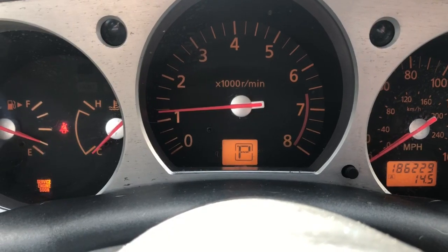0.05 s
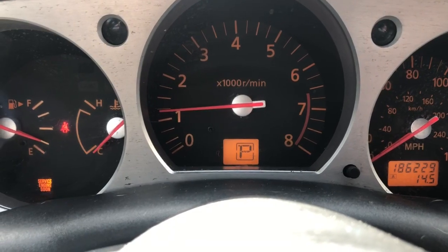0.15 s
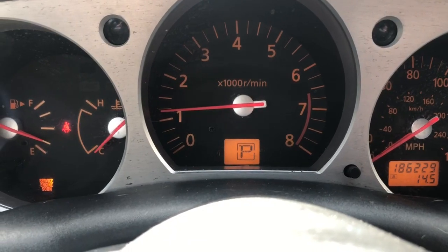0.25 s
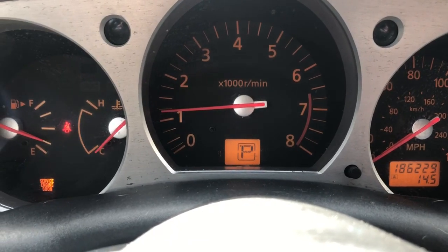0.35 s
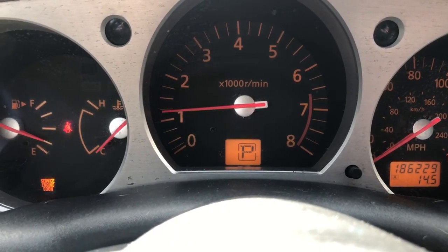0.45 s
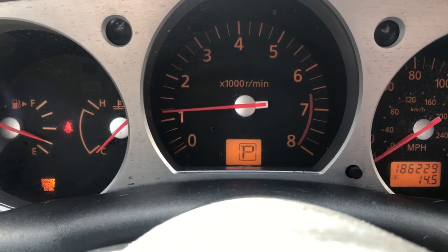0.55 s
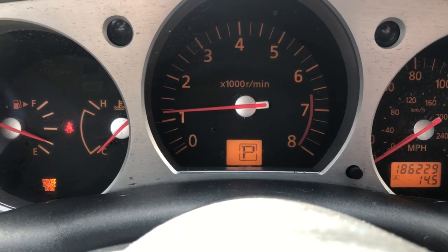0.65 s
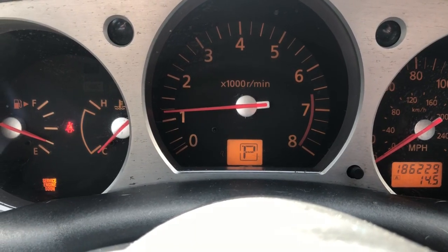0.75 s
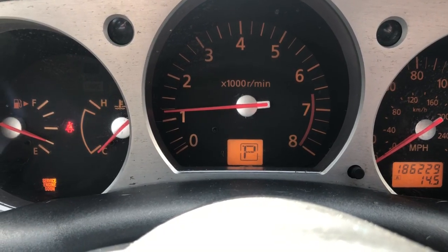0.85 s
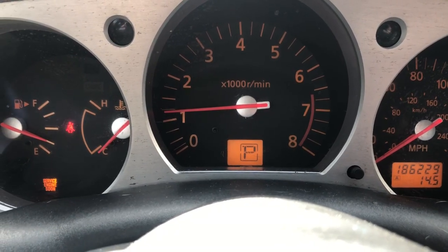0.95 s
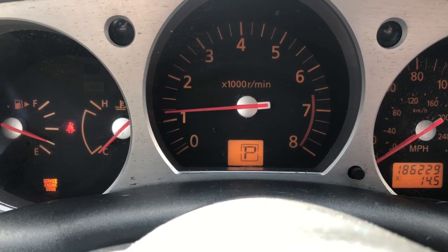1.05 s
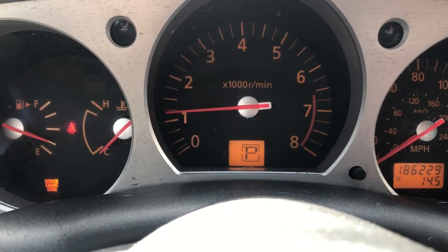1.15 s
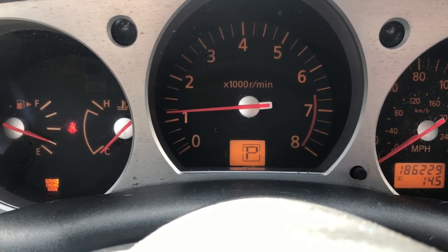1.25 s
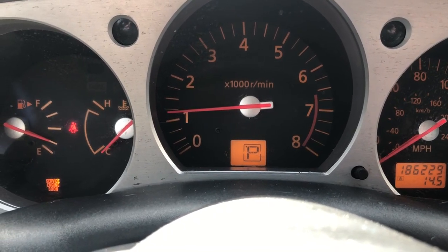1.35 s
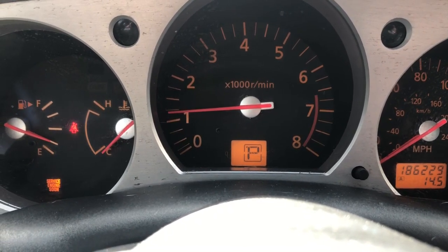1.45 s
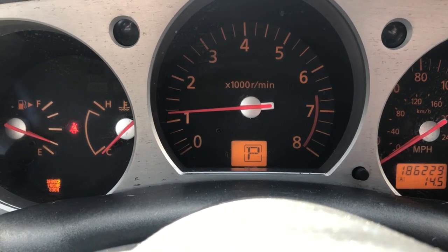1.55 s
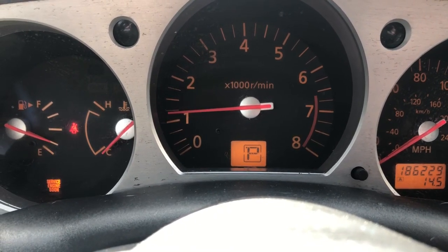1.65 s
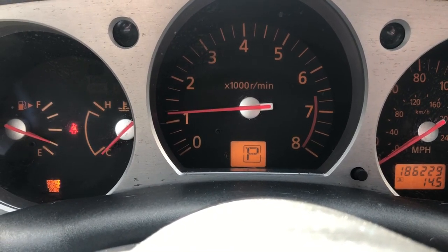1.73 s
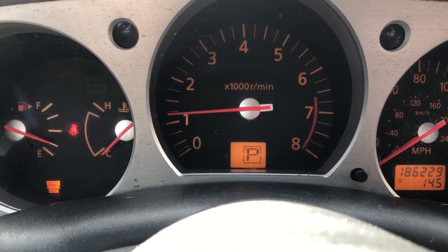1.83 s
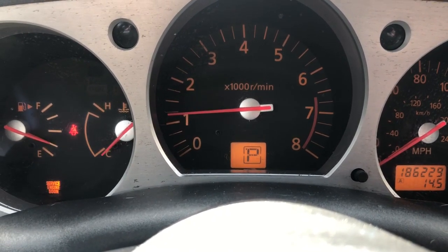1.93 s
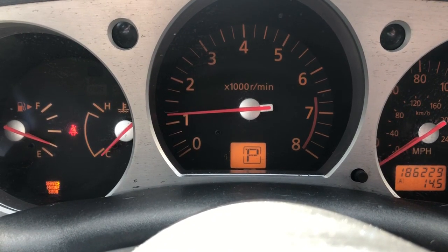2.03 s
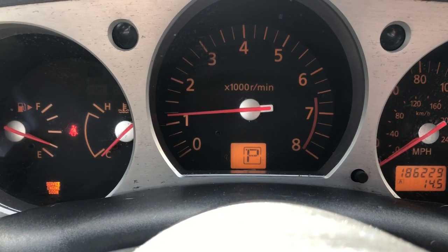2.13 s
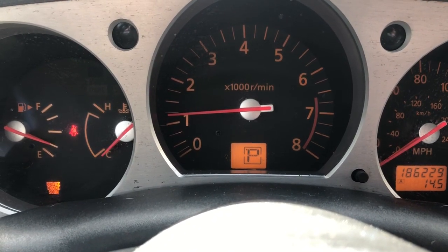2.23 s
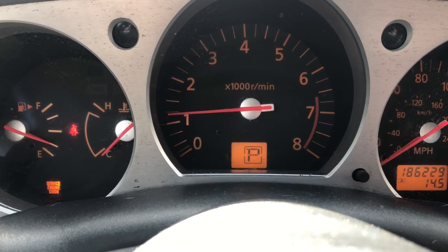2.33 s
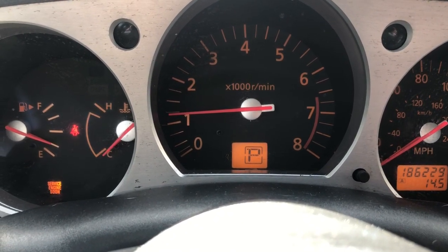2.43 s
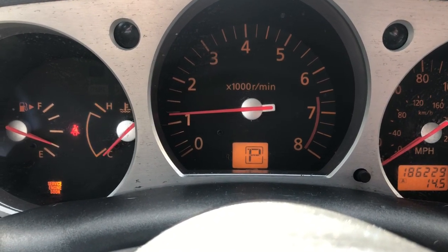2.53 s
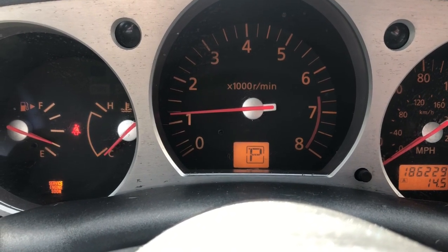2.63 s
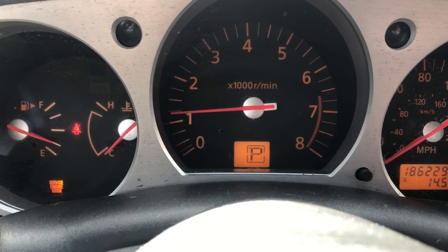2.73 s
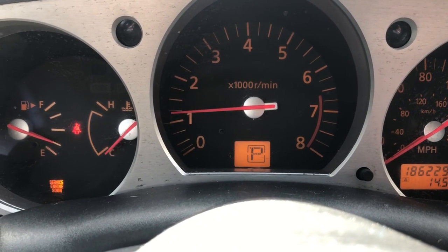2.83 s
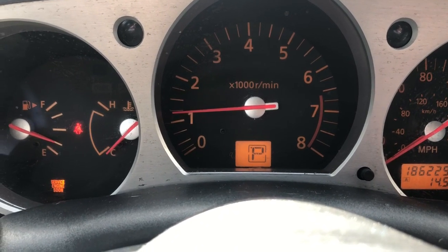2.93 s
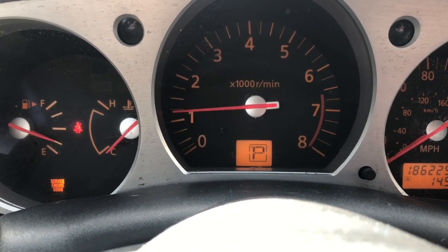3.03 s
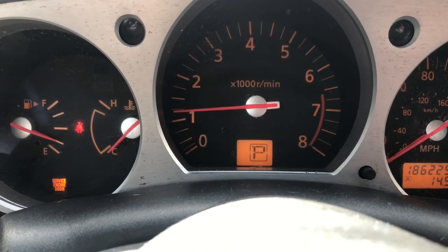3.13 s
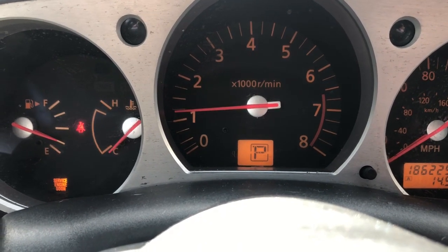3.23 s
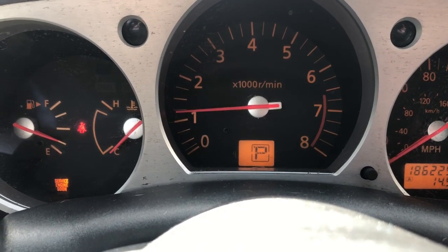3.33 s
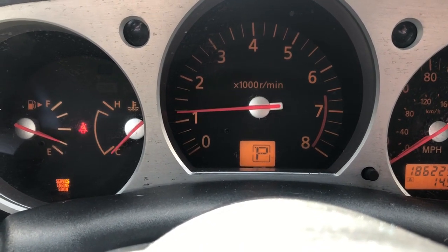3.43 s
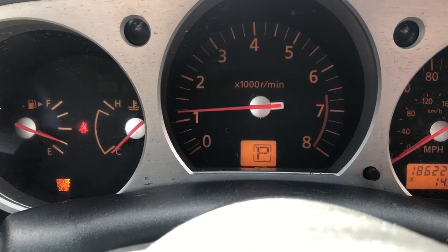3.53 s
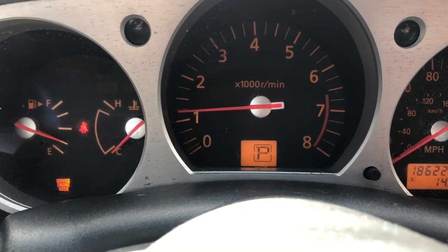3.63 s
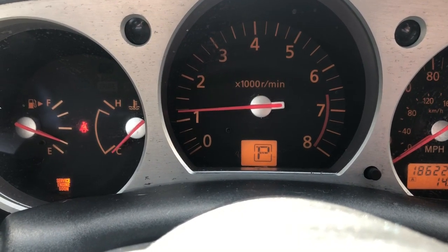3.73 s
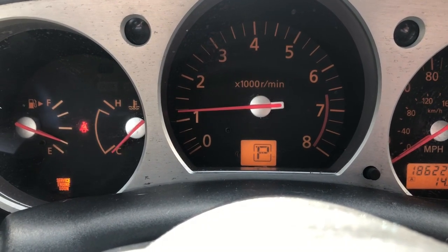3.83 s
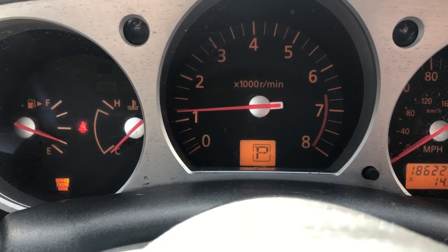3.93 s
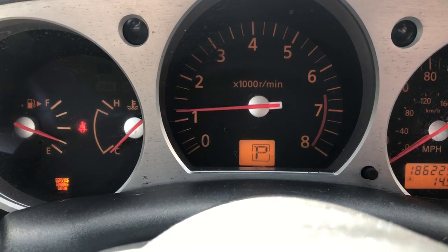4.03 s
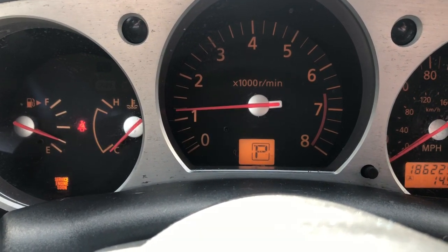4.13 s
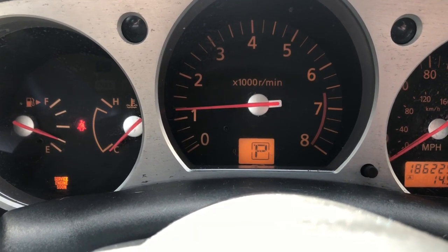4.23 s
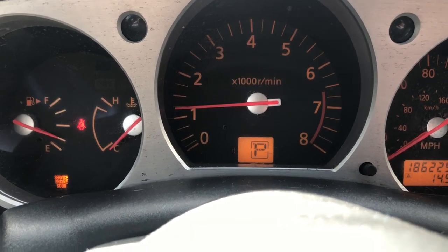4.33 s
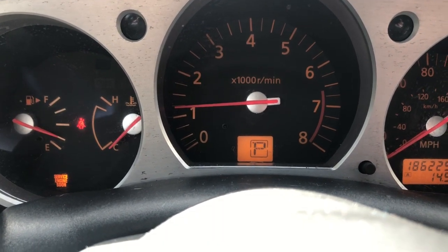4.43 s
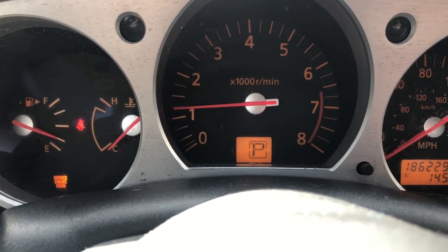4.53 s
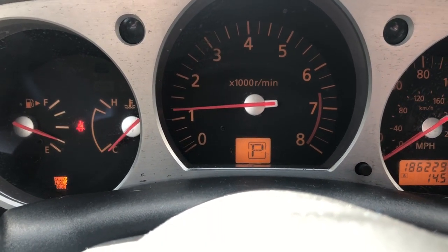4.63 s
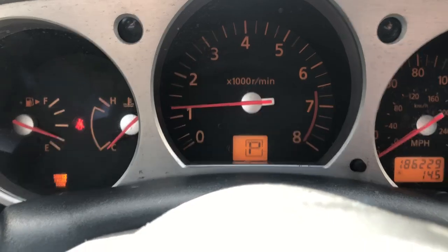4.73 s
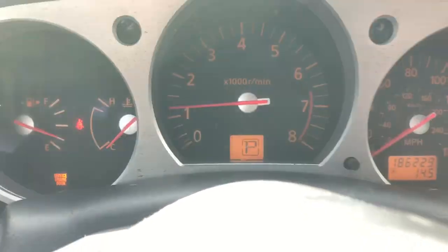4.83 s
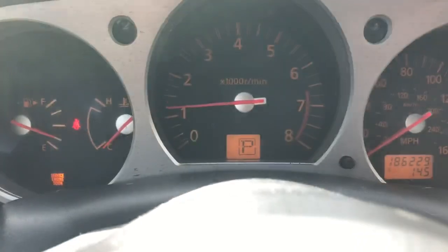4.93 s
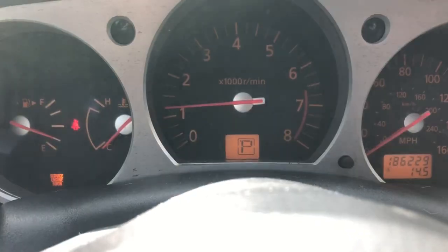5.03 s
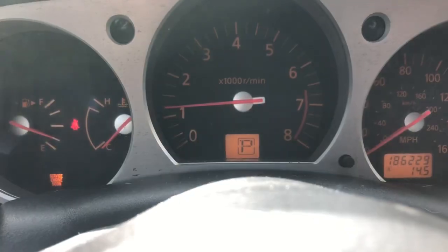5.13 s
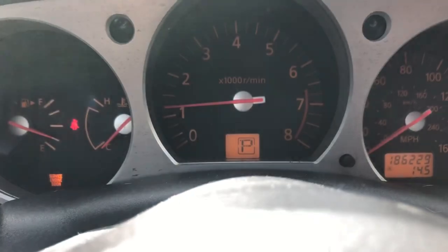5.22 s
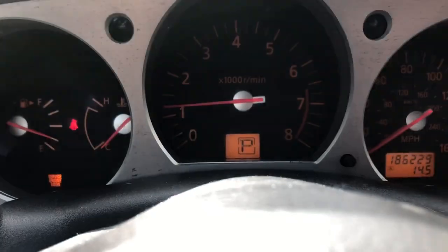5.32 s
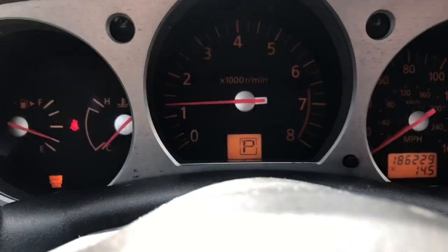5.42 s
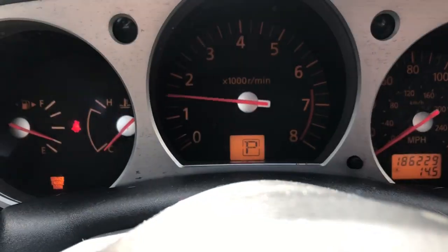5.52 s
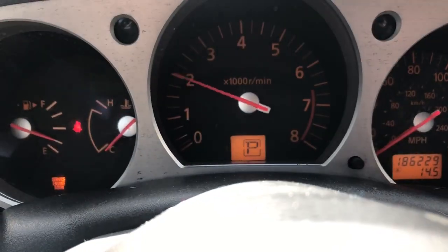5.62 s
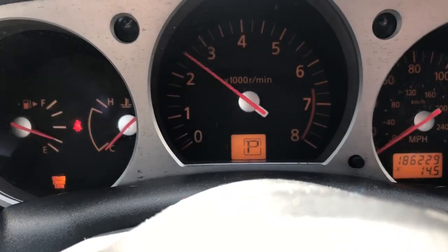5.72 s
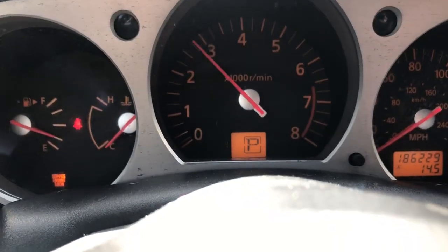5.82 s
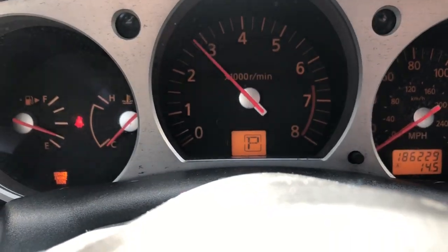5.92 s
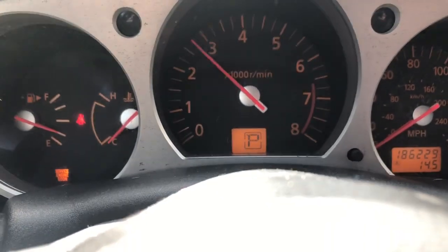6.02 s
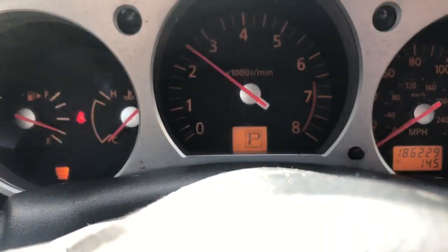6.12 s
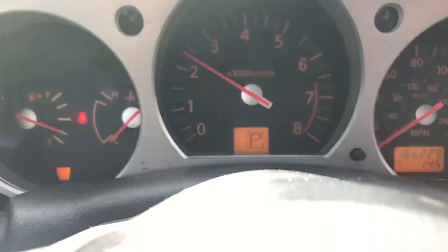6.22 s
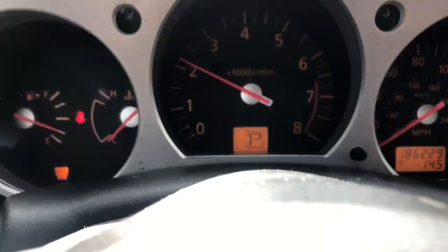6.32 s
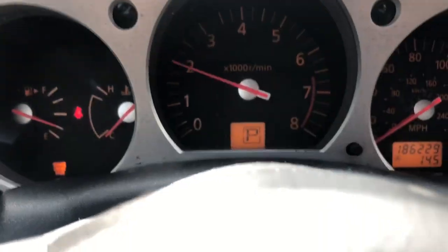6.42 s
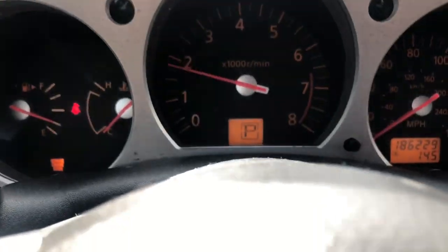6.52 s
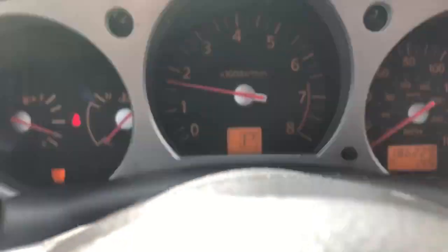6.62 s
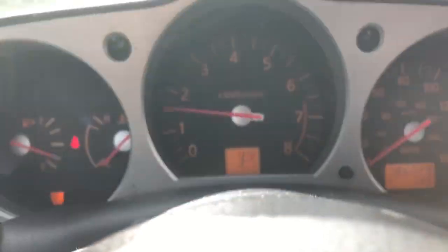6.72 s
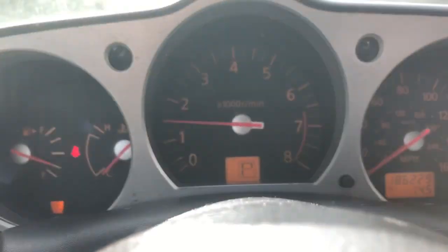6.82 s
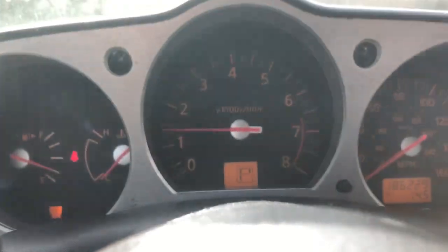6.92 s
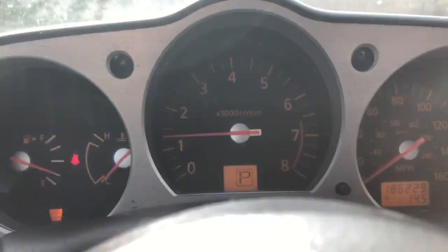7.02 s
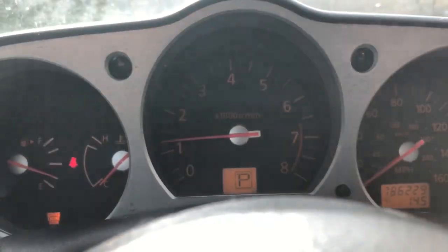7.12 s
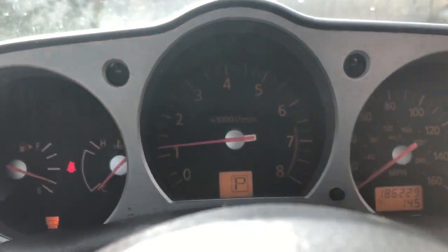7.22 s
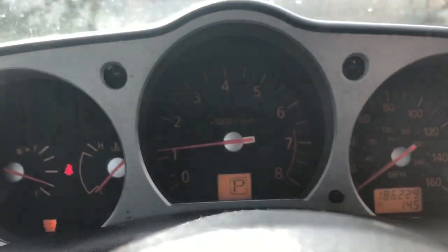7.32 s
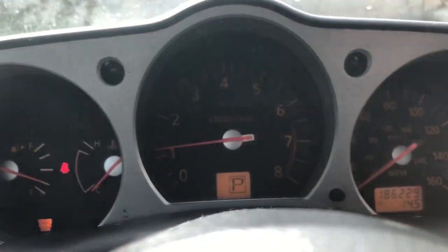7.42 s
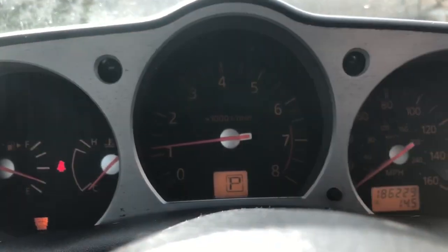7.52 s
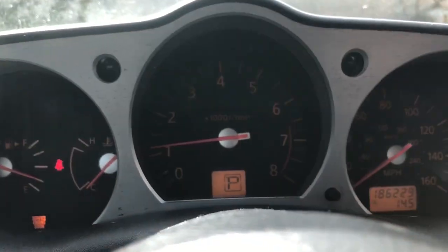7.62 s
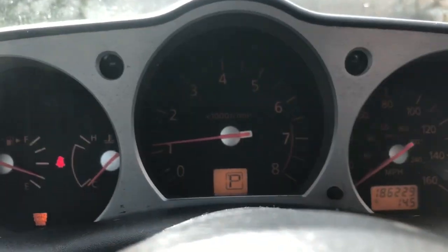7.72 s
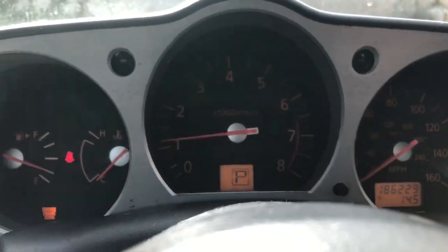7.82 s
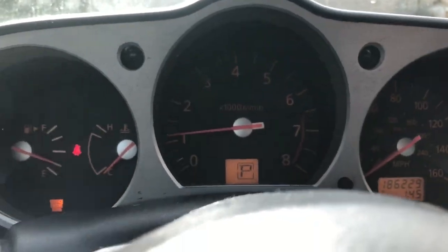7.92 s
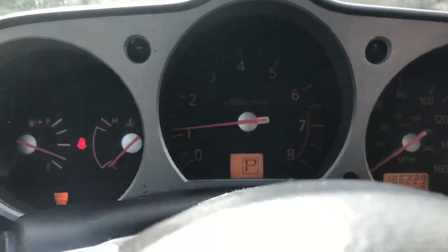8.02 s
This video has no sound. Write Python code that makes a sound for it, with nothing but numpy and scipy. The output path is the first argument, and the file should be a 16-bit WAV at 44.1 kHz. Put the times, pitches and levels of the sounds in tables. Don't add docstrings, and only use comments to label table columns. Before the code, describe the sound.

A handheld microphone near the dashboard hears a low, bassy engine drone, soft combustion roar and very faint electrical buzz and pump whine. A small click precedes one short rev, which rises fast, growls, and falls more slowly to a slightly lower idle. As it settles, the hand shifts: sharp plastic taps, brief skin rubs and low seat thuds.

```python
import sys
import numpy as np
from scipy import signal
from scipy.fft import rfft, irfft, next_fast_len
from scipy.io import wavfile
from scipy.ndimage import uniform_filter1d

SR = 44100
rng = np.random.default_rng(int(sys.argv[2]) if len(sys.argv) > 2 else 0)


def generate_wav(signal):
    frames = np.transpose(np.atleast_2d(signal))
    scaled = np.clip(frames, -1, 1) * 32767
    pcm = np.round(scaled).astype(np.int16)
    wavfile.write(sys.argv[1], SR, pcm)


def gain_from_db(level_db):
    decades = np.asarray(level_db, float) / 20
    return 10 ** decades


N = 355490
T = np.arange(N) / SR


def evened(x):
    return x / np.sqrt(np.mean(x ** 2) + 1e-20)


def curve(points, lag_s=0):
    seconds, values = np.transpose(points)
    return np.interp(T - lag_s, seconds, values)


def colour(x, points):
    hz, db = np.transpose(points)
    size = next_fast_len(len(x), True)
    f = np.fft.rfftfreq(size, 1 / SR)
    gain = gain_from_db(np.interp(np.log(f + 1), np.log(hz + 1), db))
    return irfft(rfft(x, size) * gain, size)[:len(x)]


def resonate(x, hz, width):
    r = np.exp(-np.pi * width / SR)
    turn = np.exp(2j * np.pi * min(hz, SR / 3) / SR)
    return 2 * signal.lfilter([1 - r], [1, -r * turn], x).real


def wander(rate_hz):
    step = 256
    pole = np.exp(-2 * np.pi * rate_hz * step / SR)
    slow = signal.lfilter([1], [1, -pole], rng.standard_normal(N // step + 2))
    return np.interp(np.arange(N) / step, np.arange(len(slow)), evened(slow))


def tone(turns, db, flutter_db, rate_hz):
    return np.sqrt(2) * gain_from_db(db + flutter_db * wander(rate_hz)) * np.cos(2 * np.pi * turns)


def fuzz(hz, width, db):
    band = resonate(resonate(rng.standard_normal(N), hz, width), hz, width)
    return gain_from_db(db) * evened(band)


def speed(lag_s):
    flywheel_s = 0.045
    # time in seconds, firings per second at the crankshaft.
    firing_rate = [(0.0, 55.4), (0.5, 54.8), (2.0, 54.85), (3.0, 55.7), (4.0, 56.1), (5.2, 56.0),
                   (5.41, 60.0), (5.5, 72.7), (5.68, 114.0), (5.76, 127.0), (5.84, 131.6), (6.0, 125.5),
                   (6.4, 90.2), (6.62, 75.0), (6.95, 60.8), (7.18, 55.8), (7.5, 53.1), (8.06, 52.2)]
    return uniform_filter1d(curve(firing_rate, lag_s), size=round(flywheel_s * SR))


def under_load(load, on_db, cut_db):
    return on_db * np.maximum(load, 0) + cut_db * np.minimum(load, 0)


def effort(law, rate, load):
    idle_hz = 55.5
    idle_db, octave_db, on_db, both_db, cut_db = law
    octaves = np.log2(rate / idle_hz)
    return idle_db + octave_db * octaves + under_load(load, on_db + both_db * octaves, cut_db)


def orders(rate, load):
    multiples = [1, 2, 3, 3 / 2, 2 / 3]
    # level at idle in dB, dB gained under load, dB lost in fuel cut.
    strengths = [(-33.5, 14, 16.5), (-45, 10.5, 11), (-53.5, 13, 8), (-61, 17.5, -4.7), (-47, 0.5, 10)]
    # pitch in Hz, width in Hz, level in dB.
    body = [(56.52, 3.1, 7), (69.6, 12.5, 6.5), (85, 12.6, 3), (126.1, 17, -19.5), (165.4, 15.2, 14),
            (183.3, 16, 3.5), (229, 27, 3), (257.3, 21, 6), (325, 26.5, 10.5), (41.6, 5.2, -14.5),
            (109, 8.1, -11.5)]
    ring_lag_s, skirt = 0.012, 1.26
    slow = T[::64]
    late_rate = np.interp(slow - ring_lag_s, T, rate)
    levels = []
    for multiple, (idle_db, on_db, cut_db) in zip(multiples, strengths):
        power = 0
        for hz, width, db in body:
            detuning = 2 * (multiple * late_rate - hz) / width
            power = power + gain_from_db(2 * db) / (1 + detuning ** 2) ** skirt
        body_db = np.interp(T, slow, 10 * np.log10(power))
        levels.append(idle_db + under_load(load, on_db, cut_db) + body_db)
    return levels


def boom(turns, rate, levels_db):
    first_db, second_db, third_db, bank_db, rocking_db = levels_db
    shake = rate / rate[0]
    second_turns = 2 * turns + 0.4 + 0.04 * (shake - 1) * wander(30)
    third_turns = 3 * turns + 0.45 + 0.07 * (shake - 1) * wander(30)
    bank_turns = 3 * turns / 2 + 0.054 * (shake - 1) * wander(30)
    firing = tone(turns, first_db, 0.14 * shake ** 3, 18)
    firing += tone(second_turns, second_db, 1.5 * shake, 12)
    firing += tone(third_turns, third_db, 1.1 * shake, 12)
    firing += tone(bank_turns, bank_db, 3.4, 4)
    return firing + tone(2 * turns / 3, rocking_db, 1.2, 15)


def firing_pulses(turns, even, banks, uneven):
    cylinders = [1.2, -4.4, -1.6, -2.3, 3.1, -4]
    count = int(turns[-1]) + 2
    chance = rng.standard_normal(count) + np.resize(cylinders, count)
    strength = even + banks * np.resize([1, -1], count) + uneven * chance
    return np.diff(np.floor(turns), prepend=0) * strength[turns.astype(int)]


def knock(turns, knock_db):
    uneven_orders = [1 / 2, 7 / 6, 4 / 3, 5 / 2, 7 / 2, 4, 9 / 2, 5, 6, 13 / 2, 8.73]
    uneven_db = [-12.5, -7.5, -13.5, 2.5, 2.5, -0.5, 1, -19, -2, -10.5, -3]
    # pitch in Hz, width in Hz, level in dB.
    cabin_modes = [(72, 18, -14), (172, 22, 5.5), (237, 37, -5), (309, 30, -0.5), (490, 27, -5)]
    pulse_colour = [(20, -48), (70, -5.5), (300, 7), (600, -32.5), (2000, -70.5)]  # (Hz, dB)
    pulses = colour(firing_pulses(turns, even=0, banks=0, uneven=1), pulse_colour)
    between = sum(tone(k * turns + rng.random(), db, 2.5, 4) for k, db in zip(uneven_orders, uneven_db))
    drive = gain_from_db(-1.5 + 0.083 * (knock_db + 50.5)) * evened(pulses)
    drive = drive + between * gain_from_db(-0.25 * (knock_db + 53))
    cabin = sum(gain_from_db(db) * resonate(drive, hz, width) for hz, width, db in cabin_modes)
    return gain_from_db(knock_db - 2.5) * evened(cabin + 0.23 * drive)


def roar(roar_db):
    # frequency in Hz, level in dB per Hz.
    roar_colour = [(18, -53.5), (26, -24.5), (45, -3.5), (85, -9.5), (130, -15.5), (190, -10.5), (250, -19),
                   (340, -23.5), (430, -32), (650, -31.5), (870, -37.5), (1200, -39.5), (1600, -49),
                   (2400, -80.5)]
    # pitch in Hz, width in Hz, level in dB.
    panel_modes = [(474.5, 47, 13.5), (538.5, 38, 5.5), (721.6, 38, 12.5), (850, 15, -5.5), (950, 220, 1.5),
                   (1226, 54, -2.5)]
    rumble_hz, rumble_db = 60.4, -54.5
    noise = rng.standard_normal(N)
    panels = sum(gain_from_db(db) * resonate(noise, hz, width) for hz, width, db in panel_modes)
    shaped = colour(noise + 0.57 * panels, roar_colour)
    mids = colour(shaped, [(270, -80), (280, 0), (1200, 0), (1230, -80)])
    rumble = colour(shaped, [(rumble_hz * 0.9, 0), (rumble_hz * 0.77, -30)])
    throttled = gain_from_db(roar_db + 0.68 * wander(24)) * (shaped - rumble)
    return (throttled + gain_from_db(rumble_db) * rumble) / mids.std()


def intake(hiss_db):
    # frequency in Hz, level in dB per Hz.
    air_colour = [(900, -15.5), (1200, -4.5), (1520, -6.5), (1790, -1), (2270, -3), (2730, -6.5),
                  (3500, -6.5), (4210, -12.5), (5120, -13.5), (6500, -19.5), (8000, -21), (12500, -34.5),
                  (16000, -44.5)]
    gusts_db = 0.7 * wander(15)
    return gain_from_db(hiss_db - 3.5 + gusts_db) * evened(colour(rng.standard_normal(N), air_colour))


def alternator(load):
    # whine pitch in Hz, level in dB.
    dashboard = [(1590, -92.5), (1680, -79.5), (1750, -71), (1950, -81), (2300, -84), (2700, -76),
                 (3200, -70.5), (3750, -74.5)]
    whine_hz = 28.6 * speed(0)
    whine_db = np.interp(whine_hz, *np.transpose(dashboard)) + 0.8 * load
    return tone(np.cumsum(whine_hz) / SR, whine_db, 2.2, 16)


def fuel_pump(tilt_db):
    harmonics_db = [-77, -97.5, -78, -89, -97.5]
    # pitch in Hz, width in Hz, level in dB.
    rush = (3140, 500, -76)
    pump_hz = 976.3
    pump = sum(tone(k * pump_hz * T, db, 0.71, 11) for k, db in enumerate(harmonics_db, 1))
    return gain_from_db(2.2 * tilt_db) * (pump + fuzz(*rush))


def electrics(tilt_db):
    harmonics_db = [-68.5, -99, -74, -81, -99, -85, -97.5]
    # pitch in Hz, level in dB.
    lone_tones = [(943, -72.5), (1771, -82.5), (11999, -104)]
    # pitch in Hz, width in Hz, level in dB.
    sizzle = (13800, 600, -90)
    buzz_hz = 800.2
    low = tone(buzz_hz * T, harmonics_db[0], 1.67, 2.1)
    high = sum(tone(k * buzz_hz * T, db, 0.27, 2.1) for k, db in enumerate(harmonics_db[1:], 2))
    steady = sum(tone(hz * T + 0.12 * wander(3), db, 2.2, 5) for hz, db in lone_tones)
    return low + gain_from_db(tilt_db) * high + steady + fuzz(*sizzle)


def rubs():
    # start in seconds, length in seconds, level in dB, centre in Hz, width in Hz.
    skin = [(0, .034, -80, 4000, 9000), (4.797, .012, -58, 1500, 2490), (6.808, 0.0096, -63.5, 1200, 1500),
            (6.052, .06, -69, 4034, 4040), (6.196, .05, -70.5, 3970, 4000), (6.65, .067, -72.5, 5960, 1510),
            (6.733, 0.043, -58.5, 2860, 8000), (6.754, 0.072, -77, 8400, 2500),
            (7.041, 0.073, -60.5, 3500, 2470), (7.079, .023, -70, 7460, 3000),
            (7.212, 0.13, -69.5, 3500, 6000), (7.506, 0.28, -75.5, 4000, 6000),
            (7.788, 0.008, -62.5, 6200, 5000), (7.791, .013, -46.5, 2500, 8700),
            (7.793, 0.03, -46.5, 1380, 2500), (7.797, 0.039, -64, 2500, 4000),
            (7.861, 0.058, -55.5, 1090, 1190), (7.941, 0.032, -63, 1870, 500),
            (7.927, .05, -66, 5000, 6000), (8.008, 0.014, -60.5, 5940, 12100),
            (8.056, 0.014, -65.5, 6037, 12000)]
    # start in seconds, length in seconds, level
    # in dB, centre in Hz.
    dull = [(4.785, .026, -50, 400), (5.468, .11, -43.5, 310), (7.773, 0.087, -45.5, 270),
            (7.793, .03, -51, 820), (7.819, .037, -59, 900), (7.888, .07, -46, 268),
            (7.9, 0.05, -50.5, 680), (7.911, .035, -37.5, 150), (7.941, 0.047, -57, 950)]
    bump_width = 0.45
    out = np.zeros(N + SR)
    for start, length, db, hz, width in [*skin, *((*row, bump_width * row[-1]) for row in dull)]:
        grip = evened(uniform_filter1d(rng.standard_normal(10000), size=30))
        grains = rng.standard_normal(10000) * gain_from_db(3.1 * grip)
        n = min(round(length * SR), len(grains))
        band = resonate(resonate(grains, hz, width), hz, width)
        out[round(start * SR):][:n] += gain_from_db(db) * evened(band[:n]) * signal.windows.tukey(n, 0.7)
    return out[:N]


def clicks():
    # start in seconds, peak level in dB, ring in Hz, thud as a share of the ring.
    taps = [(4.7918, -54.5, 7500, .3), (4.7976, -47, 8150, .8), (4.798, -44, 2380, .4),
            (4.8114, -52, 5130, .1), (4.998, -54.5, 2400, 2.2), (6.2616, -42.5, 2400, 0.45),
            (6.2609, -47, 5100, .1), (6.341, -50.5, 3880, .2), (6.593, -56, 910, 1.5),
            (6.679, -50, 6050, .1), (6.772, -52, 9100, .1), (6.822, -39, 2340, .2), (6.825, -50, 3850, .1),
            (6.9038, -62.5, 6000, .1), (7.004, -28, 2320, 1.56), (7.0074, -38.5, 4040, 0.77),
            (7.0601, -43, 10000, .2), (7.439, -51, 2420, .3), (7.732, -49, 2310, .4),
            (7.7935, -45.5, 1480, .4), (7.7989, -32, 2310, 0.36), (7.873, -44, 2030, .8),
            (7.8926, -43.5, 1950, 0.64), (8.005, -49, 4550, .2), (7.885, -54, 1400, .8),
            (7.935, -52.5, 5000, .4), (7.95, -60, 4000, .4), (7.966, -51.5, 1900, 0.88)]
    usual_hz, usual_s = 2400, 0.012
    out = np.zeros(N + SR)
    t = np.arange(3000) / SR
    for start, db, ring_hz, thud in taps:
        t60 = usual_s * (usual_hz / ring_hz) ** 0.3
        crack = np.clip(0.25 + 0.18 * np.log2(ring_hz / usual_hz), 0, 1)
        rings = np.sin(2 * np.pi * ring_hz * t)
        rings += thud * np.sin(2 * np.pi * 700 * t) * gain_from_db(30 * t / t60)
        snap = evened(resonate(resonate(rng.standard_normal(len(t)), 3000, 7200), 3500, 12000))
        fade = gain_from_db(db - 60 * t / t60) * np.minimum(t / 0.00055, 1)
        out[round(start * SR):][:len(t)] += (crack * snap + (1 - crack) * rings) * fade
    return out[:N]


def surge(turns, surge_db):
    # pitch in Hz, width in Hz, level in dB.
    ringing = [(68, 10, 3.5), (86, 8.9, 2.5), (164, 11, 0), (190.6, 15, -3.5), (245.8, 18, -0.5),
               (338, 18, 0), (400, 20, -10.5), (495, 16, -7.5), (746, 19, -14)]
    pulses = firing_pulses(turns, even=1, banks=0.54, uneven=0.17)
    drive = gain_from_db(surge_db) * evened(pulses)
    rung = sum(gain_from_db(db) * resonate(resonate(drive, hz, width), hz, 2 * width) for hz, width, db in ringing)
    return gain_from_db(22) * rung


def scene():
    # time in seconds, load (0 idle, 1 throttle open, -1 fuel cut as the engine sinks back).
    throttle = [(0.0, -0.18), (2.0, -0.058), (3.0, -0.12), (5.2, -0.16), (5.4, 0.01), (5.5, 0.65),
                (5.6, 0.77), (5.7, 0.69), (5.8, 0.62), (5.9, 0.039), (6.05, -0.18), (6.2, -0.19),
                (6.45, -1.1), (6.6, -0.48), (6.8, -0.18), (7.0, -0.13), (7.4, -0.29), (8.06, 0.25)]
    # time in seconds, level change in dB as the microphone tilts off the dashboard.
    tilt = [(0, 1.1), (4.6, 1.4), (5.2, -0.5), (5.8, -3.5), (6.2, -7), (6.8, -6), (7.1, -3.5), (8.06, 0)]
    # dB at idle, dB an octave of speed, dB under load, dB under load an octave,
    # dB lost in fuel cut. First the knock.
    knock_law = (-51.5, 6.5, 24, -7, 2.5)
    roar_law = (-56, 7.5, 1.8, 5, 1)
    hiss_law = (-66, 4, 4.5, -3.9, 2.8)
    surge_law = (-65.5, 11.5, 26.5, 2, 5.5)
    rate = speed(0.035)
    load, tilt_db = curve(throttle), curve(tilt)
    turns = np.cumsum(rate) / SR
    engine = boom(turns, rate, orders(rate, load))
    engine += knock(turns, effort(knock_law, rate, load))
    engine += roar(effort(roar_law, rate, load))
    engine += surge(turns, effort(surge_law, rate, load))
    cabin = intake(effort(hiss_law, rate, load)) + alternator(load)
    cabin += fuel_pump(tilt_db) + electrics(tilt_db)
    return (engine + cabin + rubs() + clicks())[None]


def low_pass(x):
    return signal.sosfilt(signal.butter(12, 15700, fs=SR, output="sos"), x)


def record(dry):
    floor_db = -80.5
    noisy = dry[0] + gain_from_db(floor_db) * rng.standard_normal(N)
    mix = colour(noisy, [(15, -13.5), (26, 0), (15600, 0), (15800, -43)])[None]
    return low_pass(mix)


dry = scene()
out = record(dry)
generate_wav(out)
```